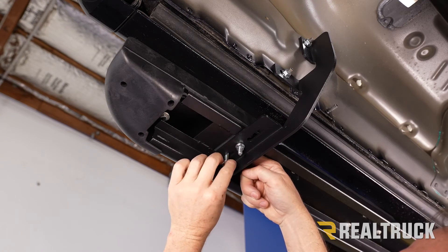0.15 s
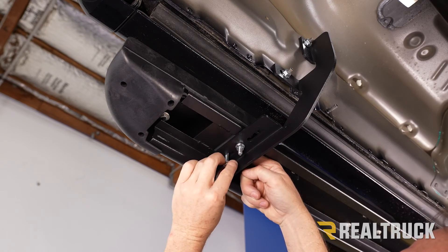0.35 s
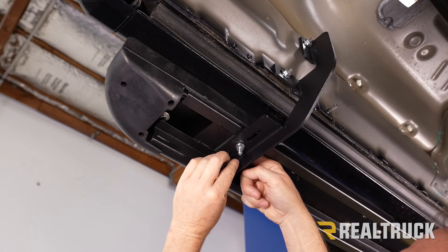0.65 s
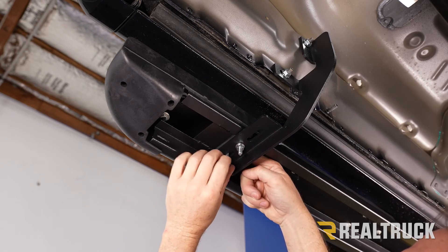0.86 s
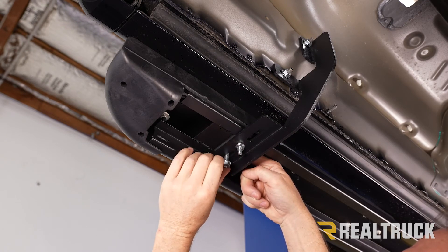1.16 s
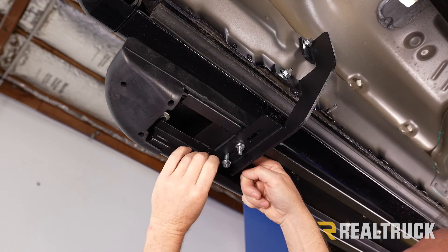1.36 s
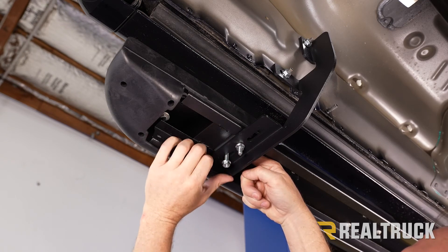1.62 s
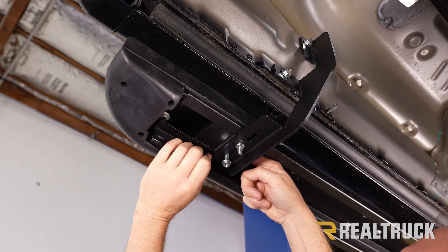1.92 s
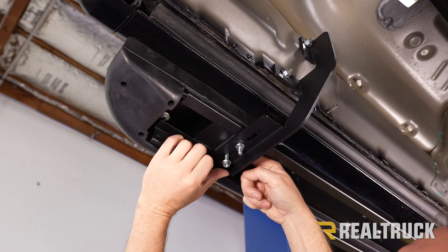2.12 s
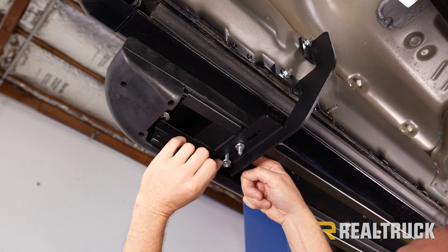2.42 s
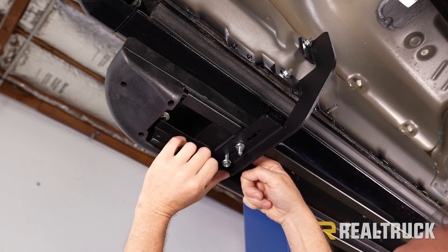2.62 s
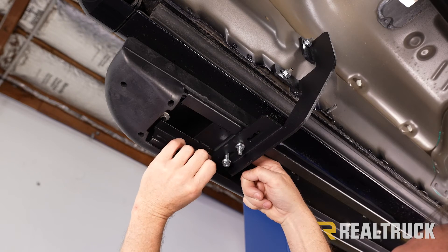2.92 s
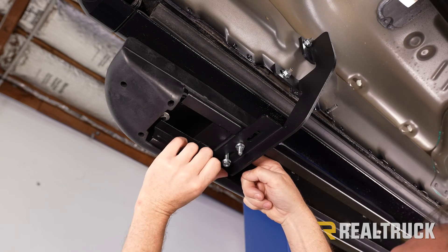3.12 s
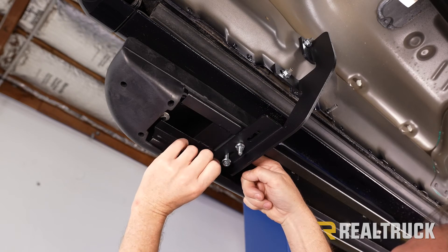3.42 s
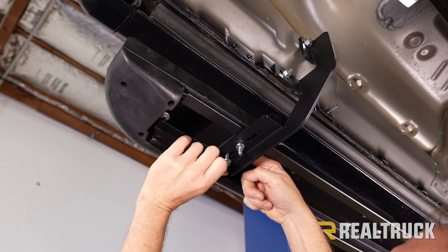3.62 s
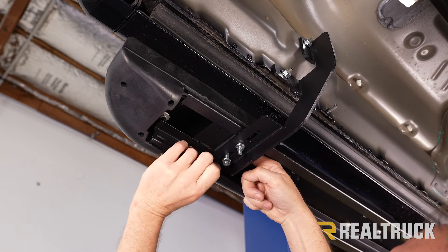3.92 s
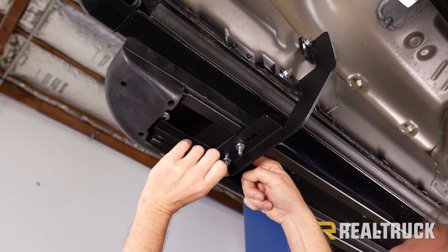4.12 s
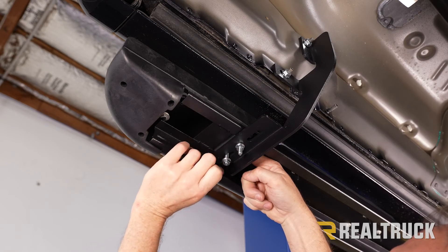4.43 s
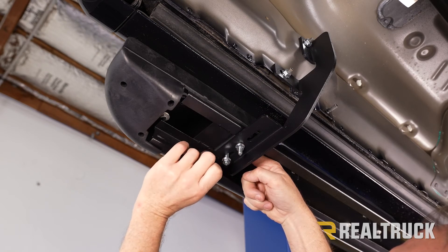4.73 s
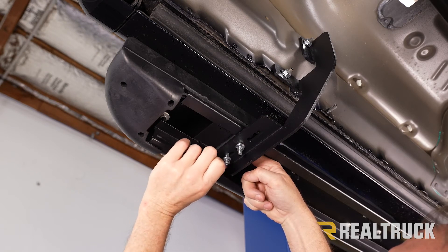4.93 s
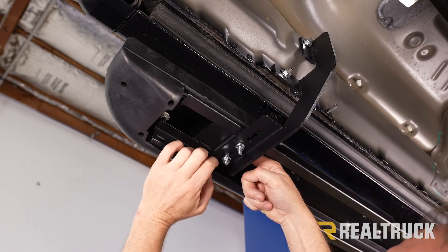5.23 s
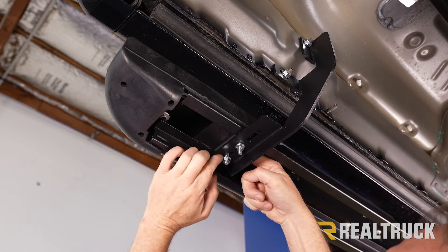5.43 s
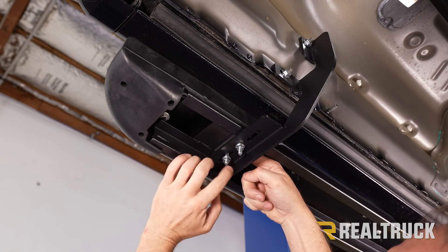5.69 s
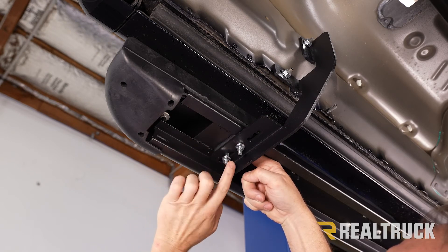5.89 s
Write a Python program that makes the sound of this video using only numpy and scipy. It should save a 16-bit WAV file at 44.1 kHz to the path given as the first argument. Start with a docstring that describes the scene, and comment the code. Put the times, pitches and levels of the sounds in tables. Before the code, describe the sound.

Close-up hand work on steel hardware: small dull knocks and fingertip scuffs, a faint slide of skin over painted metal, then hard bright clacks. Repeated quick zips of a nut along its thread each end in a sharp click, with hollow bracket resonance and an airy metallic shimmer after a strong hit. The garage is quiet, with short reflections, soft rumble and faint hum.

```python
"""In a garage, fingers flick steel nuts along bolts that pass through a bracket under a truck.
Filtered grains make each nut rasp along its thread; resonators driven by noise make the bracket hum.
Clacks, knocks, bumps and scuffs are bursts or clicks through steel modes, filters and broad spectra.
Rail chirps, sliding skin and a shimmer join later, over a faint mains hum and room rumble.
Quick reflections and a decaying room tail surround the steel."""
import sys
import numpy as np
from scipy import signal
from scipy.fft import rfft, irfft
from scipy.io import wavfile
from scipy.ndimage import uniform_filter1d

SR = 44100
rng = np.random.default_rng(int(sys.argv[2]) if len(sys.argv) > 2 else 0)


def generate_wav(signal):
    """Clip the signal to [-1, 1] and save it as 16-bit WAV at the path in sys.argv[1]."""
    frames = np.transpose(np.atleast_2d(signal))
    scaled = np.clip(frames, -1, 1) * 32767
    pcm = np.round(scaled).astype(np.int16)
    wavfile.write(sys.argv[1], SR, pcm)


N = 267062
TIME = np.arange(N) / SR
SIZE = 32768  # samples in a spectral response
FREQ = np.maximum(np.arange(SIZE // 2 + 1) * SR / SIZE, 1)
CUTOFF_HZ = 15650  # top of the recorded band


def from_db(db):
    """Decibels to gain."""
    return 10 ** (np.asarray(db) / 20)


def rms_one(x):
    """Scale to rms 1."""
    return x / np.sqrt(np.mean(x ** 2) + 1e-20)


def unit_energy(x):
    """Scale a response so that it passes white noise at the same level."""
    return x / np.sqrt(np.sum(x ** 2) + 1e-20)


def at_hz(points, hz):
    """Read a table on a log-frequency axis."""
    points = np.array(points)
    return np.interp(np.log(hz), np.log(points[:, 0]), points[:, 1])


def through(x, response):
    """Pass a sound through an impulse response."""
    return signal.fftconvolve(x, response)[:N]


def butter(x, order, hz, kind="low"):
    """Low-pass or band-pass a sound."""
    return signal.sosfilt(signal.butter(order, hz, kind, fs=SR, output="sos"), x)


def body(spectrum, resonances=()):
    """Causal (minimum-phase) response of a broad spectrum with resonances standing out of it."""
    lift = 1 + sum(from_db(db) ** 2 / (1 + (2 * (FREQ - hz) / width) ** 2)
                   for hz, width, db in resonances)
    magnitude = from_db(at_hz(spectrum, FREQ)) * np.sqrt(lift)
    # Folding the cepstrum onto positive time gives the minimum phase.
    cepstrum = irfft(np.log(magnitude))
    cepstrum[1:SIZE // 2] *= 2
    cepstrum[SIZE // 2 + 1:] = 0
    return unit_energy(irfft(np.exp(rfft(cepstrum))))


def ring(x, hz, t60):
    """A two-pole resonator: a unit click sets a sine ringing, starting at height 1."""
    radius = from_db(-60 / (t60 * SR))
    angle = 2 * np.pi * hz / SR
    return signal.lfilter([0, np.sin(angle)], [1, -2 * radius * np.cos(angle), radius ** 2], x + 1e-18)


def noise_mode(hz, width):
    """Noise through two equal resonators in a row; width in Hz is that of each one."""
    t60 = np.log(1000) / (np.pi * width)
    return ring(ring(rng.standard_normal(N), hz, t60), hz, t60)


def evened(x, seconds):
    """Hold the running level of a sound near 1."""
    power = uniform_filter1d(x ** 2, max(int(seconds * SR), 2))
    return x / np.sqrt(np.maximum(power, 0) + 1e-4 * np.mean(x ** 2))


def grains(per_s, spread_db):
    """Tiny impacts at random moments, of uneven size and random sign."""
    hits = rng.random(N) < per_s / SR
    return hits * from_db(spread_db * rng.standard_normal(N)) * rng.choice([-1, 1], N)


def taps(rows):
    """One impulse for each event."""
    out = np.zeros(N)
    for s, db, *rest in rows:
        out[int(s * SR)] += from_db(db)
    return out


def wander(per_s, spread_db):
    """A gain that drifts at random."""
    count = int(N / SR * per_s) + 2
    return from_db(spread_db * np.interp(TIME * per_s, np.arange(count), rng.standard_normal(count)))


def dying(s, t60):
    """An envelope that starts at s and dies away."""
    return (TIME >= s) * np.exp(-np.clip(np.log(1000) * (TIME - s) / t60, 0, 20))


# The colour of the still room. Each row: frequency in Hz, relative density in dB per Hz.
AIR_SPECTRUM = [(12, -51), (20, -6), (123, -5), (154, -13.5), (319, -17), (399, -20), (513, -19.5),
                (558, -14.5), (607, -23), (1190, -26.5), (1660, -29.5), (3250, -31.5), (11400, -35.5),
                (16000, -42.5)]


def background():
    """Room rumble and hiss are shaped noise; the mains hum is a steady sine."""
    air = rms_one(through(rng.standard_normal(N), body(AIR_SPECTRUM)))
    hum = np.sqrt(2) * np.sin(2 * np.pi * 121.7 * TIME)  # Hz
    return from_db(-58.5) * air + from_db(-64.5) * hum


# Pushes of a finger on a nut; a negative swell starts loud and settles.
# Each row: start in seconds, run-up in seconds, coast in seconds, nominal swell over the run-up in dB,
# nominal braking in dB per second, then the layer levels in dB before the mix: thread rasp, bracket hum,
# bright chatter.
SPINS = [ (0.0, 0.0043, 0.002, -11, 900, -63, -41.5, -88), (0.13, .004, 0.032, 8, 697, -54.5, -39.5, -83),
         (0.411, 0.006, 0.078, -11, 300, -76, -54.5, -92), (0.585, .002, .004, -3, 400, -56, -40.5, -70),
         (0.668, 0.0089, .004, 25, 692, -47.5, -37, -65),
         (0.732, 0.0036, 0.0093, -10, 300, -59.5, -44, -80), (1.271, .003, .015, -3, 300, -56.5, -47, -80),
         (1.295, 0.025, .01, 13.5, 233, -36, -36, -38.5), (1.795, 0.017, .006, -3, 295, -47, -35, -50),
         (1.872, 0.045, 0.015, 55, 456, -31.5, -22.5, -41), (1.96, .004, .04, 0, 400, -77, -37, -70),
         (2.063, 0.00067, 0.012, 2, 784, -37, -32, -43), (2.216, .002, 0.022, -7, 350, -47.5, -36.5, -71),
         (2.294, 0.018, 0.016, 7, 400, -43, -38, -54), (2.323, 0.0093, 0.0052, 28, 505, -28, -16, -36),
         (2.471, .002, 0.0027, 5, 542, -40, -39, -61), (2.532, .013, 0.0038, 32, 427, -38, -22, -68),
         (2.76, 0.022, 0.15, 16, 324, -41, -33.5, -54.5), (3.242, 0.06, 0.011, 8, 233, -36.5, -31, -44.5),
         (3.707, 0.023, 0.0025, 16, 697, -40.5, -25, -50), (3.761, 0.011, 0.036, 19, 450, -27, -21.5, -29),
         (4.217, 0.023, 0.028, 5, 400, -38.5, -31.5, -50),
         (4.256, 0.022, 0.0042, 19.5, 454, -27, -16.5, -20),
         (4.629, 0.031, 0.1, 14.5, 800, -35.5, -31, -43), (4.948, 0.013, 0.034, -6, 400, -40.5, -35.5, -55),
         (4.995, 0.011, 0.08, 10, 900, -31.5, -24, -36.5),
         (5.525, 0.029, 0.07, 12.5, 380, -33.5, -35, -40.5),
         (5.982, 0.058, 0.038, 17.5, 500, -42.5, -38.5, -49)]


def spin_gain(column, sag_db_per_s, swells, brakes):
    """A nut speeds up under the finger, coasts and is braked; each layer scales the swell and braking."""
    out = np.zeros(N)
    for row in SPINS:
        start, run_up, coast, swell_db, braking = row[:5]
        at = max(int(start * SR), 0)
        t = TIME[:min(SR // 2, N - at)]
        rising = swells * swell_db * np.clip(1 - t / run_up, 0, 1)
        sagging = sag_db_per_s * np.clip(t - run_up, 0, coast)
        stopping = brakes * braking * np.maximum(t - run_up - coast, 0)
        out[at:at + len(t)] += from_db(row[column] - rising - sagging - stopping)
    return out


# Resonances of bracket, bolt and nut.
# Each row: frequency in Hz, nominal width in Hz, nominal lift above the surrounding spectrum in dB.
STEEL_MODES = [(733, 15.4, 9.5), (973, 50, 9.5), (1332, 44, 13), (1562, 45, 8.5), (2096, 30.6, 15.5),
               (2396, 30, 6), (2630, 63, 9), (2882, 24, 11.5), (3158, 82, 8.5), (3650, 150, 10),
               (4080, 200, 4), (4517, 72, 18), (4700, 80, 2), (5515, 22, 7.5), (5580, 52, 14),
               (5830, 150, 7.5), (6140, 65, 15), (6190, 89, 10.5), (7680, 110, 4.5), (8214, 135, 17.5),
               (9600, 250, 5), (9930, 56, 6), (10840, 110, 10.5), (13200, 250, -13), (13750, 130, 7.5),
               (13976, 70, 5)]
# Colours of the rasp, the chatter and the nut running up against its seat.
# Each row: frequency in Hz, relative density in dB per Hz.
RASP_SPECTRUM = [(170, -12.5), (380, -3), (700, 5), (1100, 2), (1800, -2.5), (3100, -4.5), (4500, -20),
                 (6500, -17.5), (9000, -34), (16000, -23)]
CHATTER_SPECTRUM = [(500, 9.5), (2500, -59), (4200, 12.5), (6400, 20), (7200, -40), (8300, 15),
                    (12000, 14.5), (13400, 8), (15500, 11.5)]
SEATING_SPECTRUM = [(500, -24), (1000, 2), (1310, 18), (1700, -10), (2100, -20), (3200, -1), (6000, -51)]
# The note of the nut at its seat: frequency in Hz, width in Hz, lift in dB.
SEAT_NOTE = (1800, 27, 15)
SEATING_S = 5.4  # from here on the seat note sounds


def thread():
    """The nut grinds along the thread and trips on burrs; its colour shifts, and speed adds chatter."""
    level = spin_gain(column=5, sag_db_per_s=5, swells=0.72, brakes=1)
    burrs = from_db(-9.5) * rms_one(grains(per_s=57, spread_db=2))
    grit = (evened(grains(per_s=2200, spread_db=5.5), seconds=0.012) + burrs) * level

    # Peel off band after band from the bottom and let each drift on its own.
    remaining = through(grit, body(RASP_SPECTRUM, STEEL_MODES))
    shifting = 0
    for hz in (900, 1600, 2500, 3800):
        band = butter(remaining, 1, hz)
        shifting = shifting + band * wander(per_s=70, spread_db=3)
        remaining = remaining - band

    # Chatter needs speed: it swells and brakes more steeply than the rasp.
    bite = spin_gain(column=7, sag_db_per_s=54, swells=2.3, brakes=3)
    skips = (evened(grains(per_s=1500, spread_db=6), seconds=0.015) + burrs) * bite
    chatter = through(skips, body(CHATTER_SPECTRUM, STEEL_MODES))

    seat = through(grit * (TIME > SEATING_S), body(SEATING_SPECTRUM, STEEL_MODES + [SEAT_NOTE]))
    return from_db(-1.0) * (shifting + remaining) + from_db(-1.5) * chatter + from_db(-14) * seat


# Bending modes of the bracket. Each row: frequency in Hz, width in Hz,
# relative level in dB while the nut is being started, relative level in dB once it runs on the thread.
BRACKET_MODES = [(288, 114, 5.5, 5.5), (335.5, 30, 10.5, 8), (411, 25, 0, 5), (501.3, 14, 11.5, 24),
                 (530, 10.2, 17, 24), (546.3, 64, 21.5, 12), (614, 93, 17.5, 14.5), (930, 104, 10.5, 16)]
CAUGHT_S = 2.28  # the nut catches the thread


def bracket():
    """Close bending modes beat while the nut shakes the bracket; their balance shifts at the catch."""
    caught = np.clip((TIME - CAUGHT_S) / 0.025, 0, 1)
    hum = 0
    for hz, width, loose_db, caught_db in BRACKET_MODES:
        mode_db = loose_db + caught * (caught_db - loose_db)
        hum = hum + evened(noise_mode(hz, width), seconds=0.024) * from_db(mode_db)
    # Gentler braking lets the hum outlast the rasp.
    level = spin_gain(column=6, sag_db_per_s=22, swells=0.9, brakes=0.74)
    return from_db(-5.0) * evened(hum, seconds=0.06) * level


# Dull knocks of the bolt in its hole. Each row: start in seconds, level in dB before the mix.
KNOCKS = [(0.132, -35.5), (0.583, -44), (0.675, -25.5), (0.732, -36), (1.965, -31), (2.236, -23),
          (2.544, -28), (2.561, -18.5), (3.721, -25), (3.743, -27), (4.268, -23), (4.303, -34),
          (4.663, -30), (4.731, -27)]
# Colour of a knock. Each row: frequency in Hz, relative density in dB per Hz.
KNOCK_SPECTRUM = [(150, -37), (400, -24), (600, -28), (1200, 9), (2600, -23), (5000, -94), (12000, -59)]


def knocks():
    """A knock of the bolt rings the small parts and the bracket together."""
    bracket_modes = [(hz, width, (loose_db + caught_db) / 2)
                     for hz, width, loose_db, caught_db in BRACKET_MODES]
    return from_db(6.0) * through(taps(KNOCKS), body(KNOCK_SPECTRUM, STEEL_MODES + bracket_modes))


# Short scuffs of the fingertips.
# Each row: start in seconds, level in dB before the band filter and mix, t60 in seconds.
SCUFFS = [(0.154, -49, 0.1), (1.33, -29, 0.12), (0.3064, -63, 0.06), (0.6894, -53, 0.1), (0.7644, -47, 0.1),
          (1.398, -31, 0.043), (2.2977, -38, 0.11)]


def scuffs():
    """Fingertips slip briefly over the flats of the nut: dense grains in a band, dying away."""
    level = sum(from_db(db) * dying(s, t60) for s, db, t60 in SCUFFS)
    slip = level * rms_one(grains(per_s=12000, spread_db=7.5))
    return from_db(2.5) * butter(slip, 3, [1500, 3200], "band")


# Soft bumps of the hand. Each row: start in seconds, level in dB before the mix.
BUMPS = [(0.585, -42), (0.596, -47), (5.794, -36.5), (5.831, -32), (5.846, -39)]
# Colour of a bump. Each row: frequency in Hz, relative density in dB per Hz.
BUMP_SPECTRUM = [(40, 2), (120, 21), (330, 20.5), (600, 10), (1200, -6), (4000, -23)]


def hand():
    """Dull bumps of the hand against the panel: clicks through a low, soft spectrum."""
    return from_db(15.5) * through(taps(BUMPS), body(BUMP_SPECTRUM))


# Colours of the clack and the bolt's lower clang.
# Each row: frequency in Hz, relative density in dB per Hz.
CLACK_SPECTRUM = [(200, -31), (700, 10), (2000, -13.5), (4200, -5), (6200, -4.5), (7000, 2.5), (8200, 6),
                  (10600, 6.5), (12000, 13.5), (13400, 2.5), (15500, 1)]
CLANG_SPECTRUM = [(300, -71), (1000, -24), (2200, 4.5), (3400, -1), (4300, 5), (5600, 5), (7000, -39.5),
                  (15000, -38)]


def one_clack(db, t60, clang_db, damping=1.07, uneven_db=3, dull_share=0.95):
    """A rattle of bounces: each contact excites the resonances anew, and softer clacks are duller."""
    t = TIME[:SIZE // 4]
    contacts = rng.standard_normal(len(t)) * (rng.random(len(t)) < 0.4)
    bounces = evened(contacts, seconds=0.001)
    rattle = from_db(db) * bounces * np.exp(-np.minimum(np.log(1000) * t / t60, 20))

    # Every clack finds the modes slightly retuned and unevenly strong.
    chance = rng.standard_normal((len(STEEL_MODES), 2))
    modes = [(hz * (1 + 0.0014 * detune), width * damping, lift - 2 + uneven_db * uneven)
             for (hz, width, lift), (detune, uneven) in zip(STEEL_MODES, chance)]

    softness_db = dull_share * max(-26 - db, 0)
    spectrum = [(hz, level - softness_db * (hz / CUTOFF_HZ) ** 2) for hz, level in CLACK_SPECTRUM]
    response = body(spectrum, modes) + from_db(clang_db) * body(CLANG_SPECTRUM, modes)
    return signal.fftconvolve(rattle, response)


# Steel on steel. Each row: start in seconds, level in dB before the resonances and mix,
# t60 of the rattle in seconds, level of the bolt's lower clang against the clack in dB.
CLACKS = [(0.6714, -50, 0.023, 3), (1.3253, -27.5, 0.045, -5), (1.793, -25.5, 0.042, -8),
          (1.914, -13.5, 0.021, -9), (1.9279, -22.5, 0.05, -4), (2.062, -28.5, 0.037, -5.5),
          (2.2148, -42.5, 0.042, 9.5), (2.3304, -21, 0.061, 1.5), (2.3415, -22.5, 0.031, 1),
          (2.4698, -23.5, 0.022, -3), (2.543, -43, 0.014, -13), (2.562, -42.5, 0.022, 3.5),
          (2.7586, -50.5, 0.029, 2), (2.7747, -37, 0.019, 6.5), (2.8585, -40, 0.094, -0.5),
          (3.2416, -33, 0.027, -0.5), (3.2903, -40, 0.032, 6), (3.7073, -47, 0.051, 4.5),
          (3.7779, -13.5, 0.064, -5), (4.217, -41, 0.035, 1), (4.2761, -16, 0.03, 0),
          (4.63, -44.5, 0.029, 8.5), (4.677, -34.5, 0.078, -9), (4.739, -35.5, 0.033, 0.5),
          (4.9468, -41.5, 0.035, 5.5), (5.001, -29, 0.029, -5), (5.0074, -15, 0.041, -2),
          (5.073, -31.5, 0.045, 2), (5.5246, -40, 0.018, 7.5), (5.576, -33.5, .032, -7),
          (5.9826, -54, 0.047, 8.5), (6.031, -47, 0.07, -3)]
# Diffuse after-ring of the underbody. Each row: frequency in Hz, relative density in dB per Hz.
AFTER_RING_SPECTRUM = [(700, 6), (1800, 6.5), (3000, 11.5), (4900, -23), (5750, 15), (6400, 3), (7100, -7),
                       (8400, -10), (9100, -17), (9700, -3), (10800, -36), (15000, -24)]


def clacks(after_t60=1.0):
    """Steel hits steel; the blows leave a diffuse ring and a deep thud."""
    direct = np.zeros(N)
    for s, db, t60, clang_db in CLACKS:
        at = int(s * SR)
        sound = one_clack(db, t60, clang_db)[:N - at]
        direct[at:at + len(sound)] += sound

    blows = taps(CLACKS)
    fade = np.exp(-2 * np.log(1000) / (after_t60 * SR))
    # Energy left in the sheet metal; the cube lets hard blows dominate.
    stored = np.sqrt(signal.lfilter([1], [1, -fade], blows ** 3))
    after = from_db(-32.0) * stored * through(rng.standard_normal(N), body(AFTER_RING_SPECTRUM))

    sway = ring(blows ** 0.67, hz=26.3, t60=0.21)
    sway_speed = np.gradient(sway) * SR / (2 * np.pi * 27)
    thud = butter(sway_speed, 2, 100)
    return from_db(-0.5) * direct + after, from_db(-18.5) * thud


# The hand slides along the rail to a new grip.
# Each row: start in seconds, length in seconds, level in dB before drift and mix.
SLIDES = [(1.125, 0.14, -68.5), (1.414, 0.53, -64)]
# Colour of skin on paint. Each row: frequency in Hz, relative density in dB per Hz.
SKIN_SPECTRUM = [(200, -25), (550, 2), (1000, -1.5), (2500, -5), (4500, -10), (9000, -15), (15000, -18)]


def sliding():
    """Skin rustles faintly over painted steel, swelling and fading with each move."""
    level = 0
    for s, length, db in SLIDES:
        progress = np.clip((TIME - s) / length, 0, 1)
        level = level + from_db(db) * np.sqrt(np.abs(np.sin(np.pi * progress)))
    rustle = through(rng.standard_normal(N), body(SKIN_SPECTRUM))
    return level * wander(per_s=25.3, spread_db=1.5) * rustle


# Flicks that send a bending wave down the rail. Each row: start in seconds, level in dB before the mix.
FLICKS = [(2.214, -12.5), (3.241, -21), (3.73, -13), (4.229, -13), (4.64, -22), (4.947, -10.5)]


def rail_echo(delay_at_1khz=0.018, loss_db=-6):
    """Bending waves run to and fro in the steel rail as falling chirps: low notes travel slower."""
    trip = np.exp(-4j * np.pi * delay_at_1khz * np.sqrt(1000 * FREQ))
    # The feedback sums every return, each weaker by the loss.
    returns = irfft(trip / (1 - min(from_db(loss_db), 0.9) * trip))
    chirps = butter(returns, 3, [600, 1500], "band")
    return from_db(2) * through(taps(FLICKS), unit_energy(chirps))


# A blow that leaves a loose part singing.
# Each row: start in seconds, starting level in dB before the mix, t60 in seconds.
SINGS = [(4.2755, -55, 1.34)]
# Bands of the loose part. Each row: frequency in Hz, width of each resonator in Hz, relative level in dB.
SINGING_BANDS = [(5700, 470, 3), (6100, 200, -6), (8400, 360, -6), (8900, 400, -8)]


def singing():
    """Close, high modes of a loose part ring on after a blow, as an airy shimmer."""
    shimmer = 0
    for hz, width, db in SINGING_BANDS:
        shimmer = shimmer + from_db(db) * rms_one(noise_mode(hz, width))
    return rms_one(shimmer) * sum(from_db(db) * dying(s, t60) for s, db, t60 in SINGS)


# How long the room rings. Each row: frequency in Hz, t60 in seconds.
GARAGE_T60 = [(200, 0.9), (600, 0.31), (2000, 0.4), (6000, 0.54), (8200, 0.31), (10000, 0.32),
              (16000, 0.65)]


def garage(x, near_db=-8, near_t60=0.03, far_db=-16):
    """Quick reflections from the underbody and floor, then the room's tail, dying band by band."""
    t = TIME[:SR]
    near = rng.standard_normal(SR) * (t > 0.003) * np.exp(-np.log(1000) * t / near_t60)
    edges = np.geomspace(100, 17000, 11)
    tail = 0
    for low, high in zip(edges, edges[1:]):
        noise = butter(rng.standard_normal(SR), 2, [low, high], "band")
        tail = tail + noise * np.exp(-np.log(1000) * t / at_hz(GARAGE_T60, np.sqrt(low * high)))
    far = unit_energy(tail * (t > 0.012))
    return through(x, from_db(near_db) * unit_energy(near) + from_db(far_db) * far)


def scene(wall_cut_hz=11500):
    """The steel parts heard from close by; their reflections lose the highest treble."""
    clack, thud = clacks()
    steel = thread() + clack + singing() + knocks() + scuffs() + sliding() + hand() + rail_echo()
    hum = bracket()
    to_walls = butter(steel + from_db(-1.5) * hum, 2, min(wall_cut_hz, CUTOFF_HZ))
    room = garage(to_walls)
    return (from_db(-4.0) * (steel + hum + room) + thud + background())[None]


def record(dry):
    """Peaks are rounded and the top is cut steeply."""
    rounded = 0.46 * np.tanh(dry / 0.46)
    return signal.sosfilt(signal.ellip(10, 0.2, 70, CUTOFF_HZ, fs=SR, output="sos"), rounded)


dry = scene()
out = record(dry)
generate_wav(out)
```